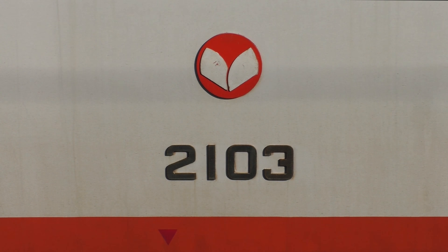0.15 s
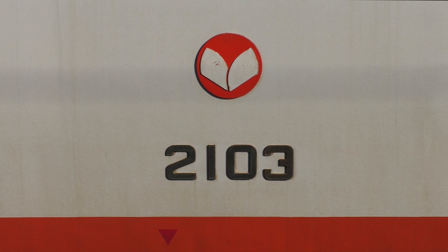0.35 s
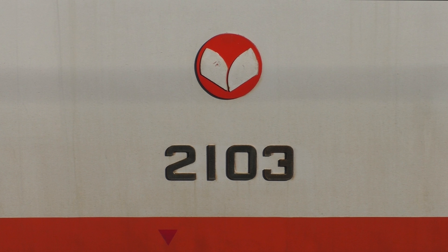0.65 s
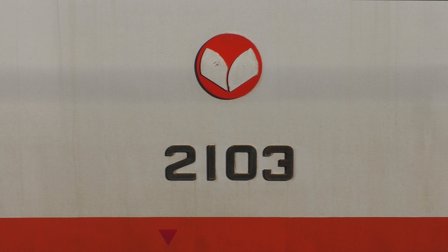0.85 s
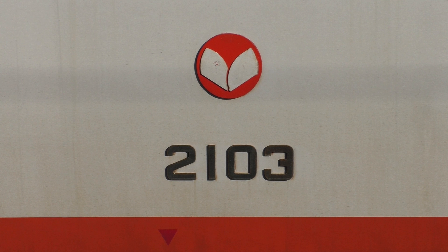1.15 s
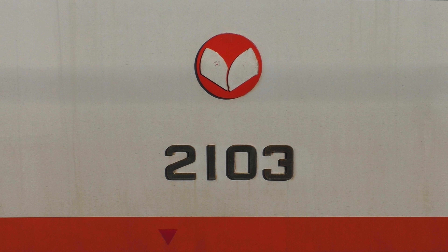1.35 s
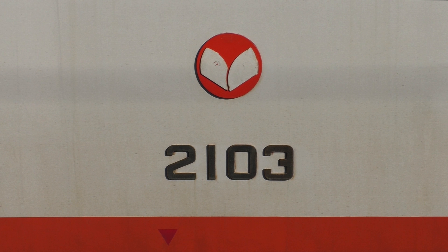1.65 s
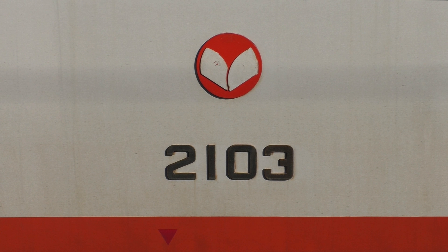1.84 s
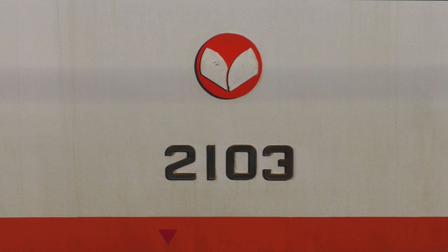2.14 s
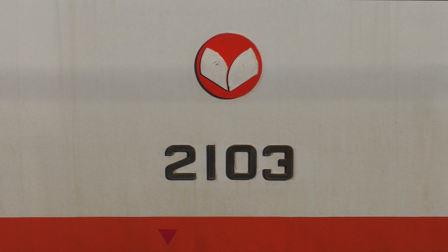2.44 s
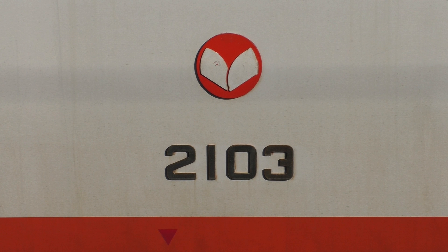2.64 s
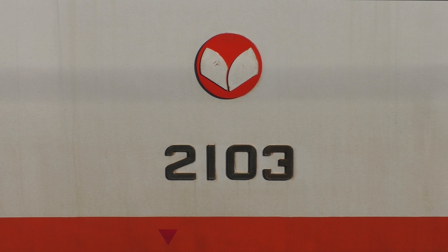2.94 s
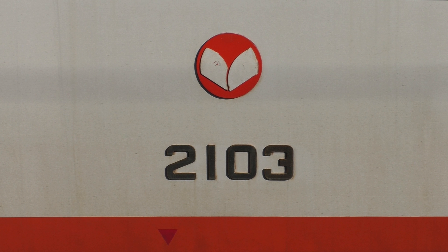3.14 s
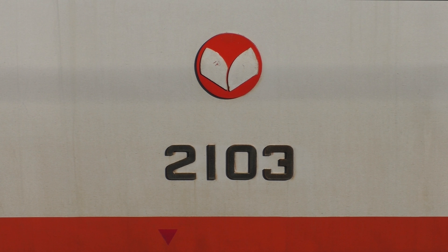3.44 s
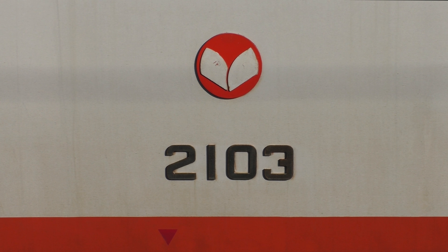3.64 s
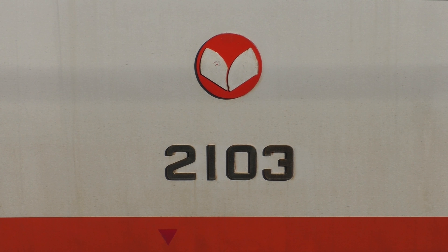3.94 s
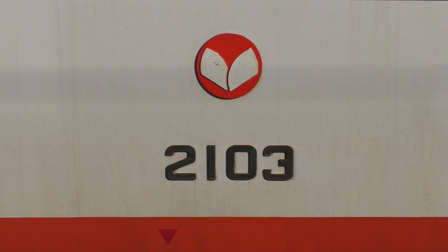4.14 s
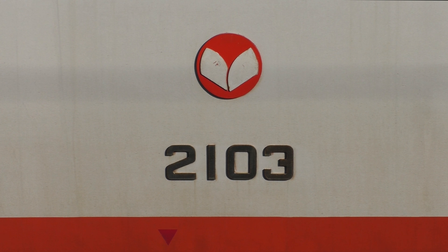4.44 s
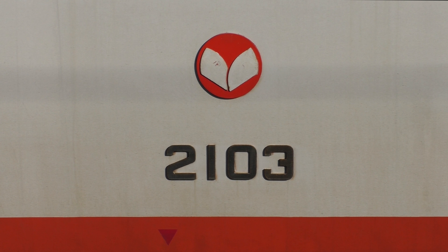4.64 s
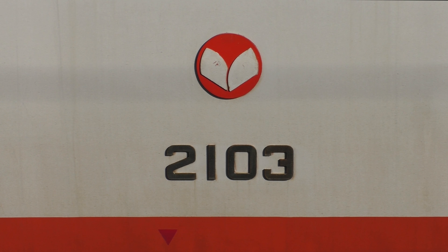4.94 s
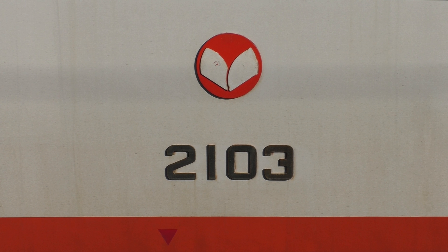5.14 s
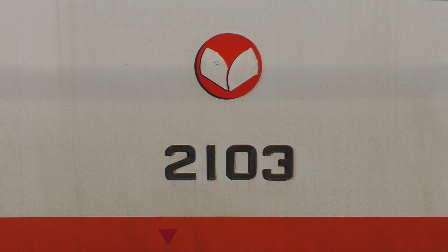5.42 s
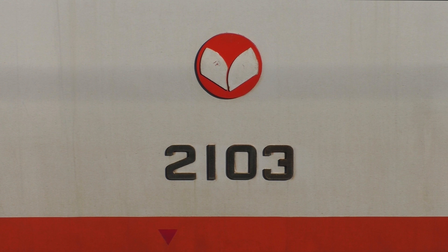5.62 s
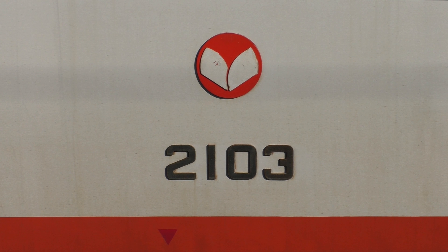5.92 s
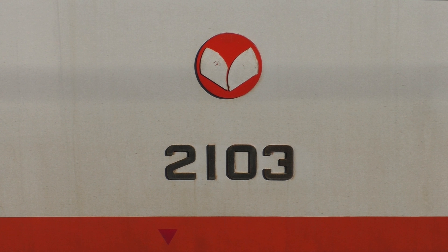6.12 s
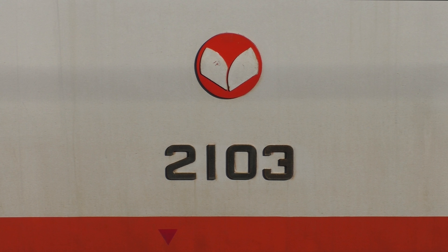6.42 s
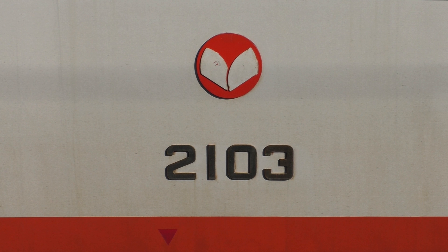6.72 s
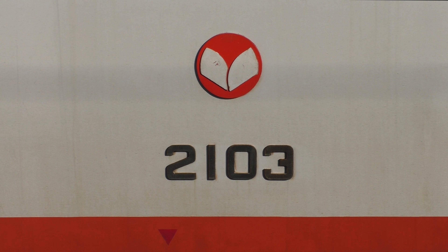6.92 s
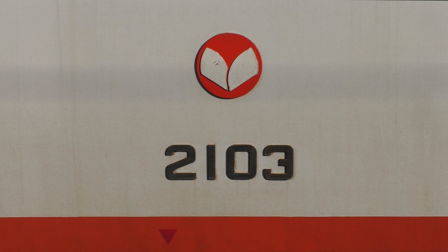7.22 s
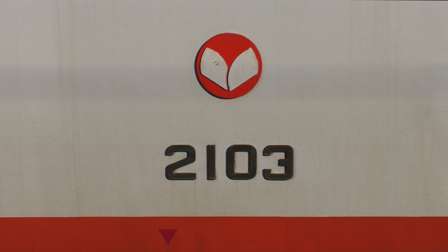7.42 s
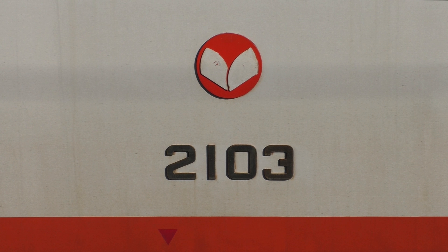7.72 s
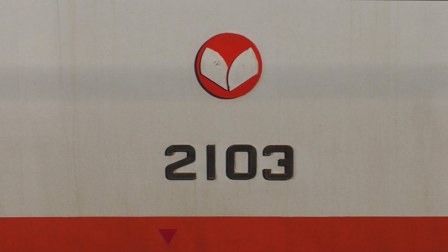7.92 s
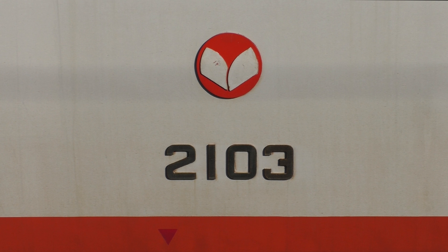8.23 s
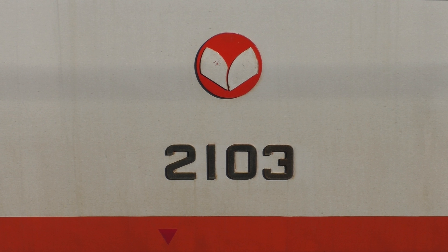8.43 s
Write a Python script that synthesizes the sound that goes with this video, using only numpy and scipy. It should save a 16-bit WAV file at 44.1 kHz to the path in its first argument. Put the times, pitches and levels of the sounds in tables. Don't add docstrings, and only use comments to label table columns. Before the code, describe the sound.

Already running as the sound swells in, a train's air compressor hammers steadily beside a station platform. Each quick turn combines a dull thump, droning casing, hollow metal knocks and crisp valve clatter. An early tank growl subsides around two seconds, while a roughly one-kilohertz whine and airy fan noise persist. Two close-spaced microphones a few metres away catch short scattered reflections from the car side and canopy, with no stop at the end.

```python
import sys
import numpy as np
from scipy import signal
from scipy.fft import rfft, irfft
from scipy.io import wavfile
from scipy.ndimage import uniform_filter1d

SR = 44100
rng = np.random.default_rng(int(sys.argv[2]) if len(sys.argv) > 2 else 0)


def persist_wave(psi):
    counts = np.round(np.clip(psi, -1, 1) * 32767).astype(np.int16)
    wavfile.write(sys.argv[1], SR, np.atleast_2d(counts).T)


def ratio_of_db(decibels):
    return 10 ** (np.asarray(decibels, float) / 20)


N = 377937

CRANK_HZ, START_TURN = 9.18, 1.208
# time in seconds, speed in turns per second.
SPEED_HZ = [
    (0, 9.177),
    (1.4, 9.1595),
    (4, 9.1735),
    (6.2, 9.198),
    (8.57, 9.208),
]
# rms level in dB of crank orders 3, 4, 5 ..
DRONE_DB = [-55, -49, -52, -63, -42, -43, -46, -54, -43, -43, -51, -53, -36, -44, -52, -53, -43, -35, -40,
            -40, -45, -32, -43, -46, -42, -48, -52, -48, -39, -42, -48, -47, -44, -42, -37, -46, -43, -33]
THUMP_TURN, THUMP_TOP_HZ = -0.005, 145
REBOUND_GAIN, REBOUND_TURN = -0.63, 0.223
# angle in crank turns, centre in Hz, width in Hz, level in dB.
KNOCKS = [(.55, 208, 67, -31.5), (.29, 419.6, 74, -21), (.43, 449, 81, -24.5), (.7, 426, 59, -31),
          (0.0208, 472, 65, -29.5), (.5, 789, 74, -23), (.51, 742, 90, -20.5), (0.68, 756, 85, -23.5),
          (0.25, 713, 78, -22), (0.27, 780, 39, -28.5), (0.51, 715, 63, -30), (.1, 700, 64, -42),
          (.51, 1444, 290, -22), (.08, 1200, 420, -57)]
TANK_TOP_HZ = 600
BLOW_JITTER_SAMPLES, BLOW_SPREAD_DB = 2.5, 1.8
# angle in crank turns, level in dB, t60 in seconds.
INLET = [
    (.712, -18.5, 0.06),
    (0.758, -25.5, 0.033),
    (.81, -28.5, 0.069),
    (0.871, -32, 0.21),
]
OUTLET = [
    (0.99, -18.5, 0.067),
    (0.0034, -24.5, 0.037),
    (0.11, -29, 0.062),
    (.16, -31.5, 0.24),
]
SEAT = [
    (0.259, -22.5, 0.11),
    (0.328, -40, 0.096),
]
# centre in Hz, width in Hz, level in dB.
INLET_RING = [(3173, 72, -8.5), (3160, 340, -3.5), (3326, 140, -4), (3687, 195, -1), (4030, 370, -4),
              (4270, 440, -11), (6640, 568, -9.5), (6630, 158, -7.5)]
OUTLET_RING = [(2894, 210, -7.5), (3360, 330, -6.5), (3730, 206, -1.5), (4160, 326, -7), (4423, 243, -3),
               (5000, 490, -11), (5460, 250, -5.5), (6920, 1880, -16), (7920, 5700, -24),
               (10780, 1500, -24.5), (14000, 2100, -53)]
SEAT_RING = [(4030, 460, -9), (4360, 260, -3), (5390, 195, -5), (7240, 1700, -23)]
# angle in crank turns, centre in Hz, width in Hz, level in dB.
PINGS = [
    (.965, 3814, 250, -17.5),
    (.995, 5460, 290, -21),
]
TICK_JITTER_SAMPLES, TICK_SPREAD_DB = 1.0, 1.3
INLET_MEMORY, OUTLET_MEMORY, SEAT_MEMORY, RATTLE_MEMORY = 0.9, 0.888, 0.68, 0.97
# dB at start, dB per second.
KNOCK_DRIFT, INLET_DRIFT, OUTLET_DRIFT, PING_DRIFT = (-0.6, -0.24), (0.2, 0.057), (0.7, -0.11), (-1.5, -0.3)
STEPS_PER_TURN = 4800
# multiple of the crank rate, level in dB.
GEARS = [(164.33, -40), (235.52, -51), (255.6, -47)]
WHINE_ORDER, WHINE_DB = 117.761, -29.5
WHINE_DB_PER_HZ = 179
SIDE_TONE_DB, THROB_RAD, THROB_SLIP_RAD_PER_TURN = -33, 1.74, -0.007
MOTOR_ORDER, MOTOR_DB = 2.4, -64
BOOM_DB, BOOM_REST_DB, BOOM_RISE_S, BOOM_END_S, BOOM_FALL_S = 6, -3, 0.36, 1.5, 0.5
# frequency in Hz, density in dB per Hz.
RATTLE_DB = [(250, -6), (400, 11.5), (600, -1), (800, -1.5), (1000, -6), (1400, -0.5), (2000, -20),
             (2600, -30), (4000, -10), (8000, -83)]
# frequency in Hz, density in dB per Hz.
RUSH_DB = [(15, -44), (25, -26), (204, -2), (399, -5.5), (598, -6.5), (741, -4.5), (1000, -5), (1200, -8.5),
           (2630, -15), (3720, -18), (5580, -24), (8000, -37), (10400, -48), (15500, -47)]
# frequency in Hz, level in dB.
APART_DB = [(25, -5), (100, -11), (300, -14), (1000, -14), (3000, -13), (8000, -8), (11000, -24),
            (15500, -24)]
# frequency in Hz, level in dB.
ECHO_DB = [(25, -20), (150, -6), (400, -4), (1200, -3), (5000, 0), (9000, -10), (11000, -25), (15500, -30)]
# frequency in Hz, left minus right in dB.
PORT_DB = [(25, 4.5), (60, 3.8), (160, 4), (300, .5), (500, -3.5), (800, -4), (1400, -3.5), (2800, -4.5),
           (5000, -2), (8000, 0), (15000, .3)]
# frequency in Hz, left lead in radians.
PORT_RAD = [(25, 0), (125, -.6), (300, -.4), (800, .2), (1800, .5), (3100, .7), (4650, 1.3), (6800, 1.75),
            (9000, 2.05), (11100, 2.45), (15500, 2.5)]
# frequency in Hz, gain in dB.
TONE_DB = [(25, 0.5), (300, -0.5), (3000, 0), (5000, 0.5), (7000, 2), (9000, 8.5), (11500, 12),
           (14000, 17.5), (14700, 3), (15800, -14)]
FADE_FROM_DB, FADE_S = -9, 0.75


def level(x, db):
    return x * ratio_of_db(db) / np.sqrt(np.mean(x ** 2))


def along_hz(table):
    hz, value = np.transpose(table)
    bins_hz = np.fft.rfftfreq(N, 1 / SR)
    return np.interp(np.log(bins_hz + 1), np.log(hz + 1), value)


def colour(x, table):
    return irfft(rfft(x) * ratio_of_db(along_hz(table)), N)


def ring(x, hz, width_hz):
    return signal.lfilter(*signal.iirpeak(hz, hz / width_hz, SR), x)


def walk(rate_hz):
    k = int(SR / rate_hz)
    held = np.repeat(rng.standard_normal(N // k + 1), k)
    smooth = uniform_filter1d(uniform_filter1d(held, k), k)
    return 1.12 * smooth[:N]


def blows(turn, at_turn, db, late_samples, spread_db):
    hit = np.flatnonzero(np.diff(np.floor(turn - at_turn)))
    late, force = rng.standard_normal((len(hit), 2)).T
    out = np.zeros(N)
    place = np.clip(hit + (late_samples * late).astype(int), 0, N - 1)
    out[place] = ratio_of_db(db + spread_db * force)
    return out


def echoing_noise(turn, memory):
    memory = np.clip(memory, 0, 0.99)
    fresh = rng.standard_normal((int(turn[-1]) + 40, STEPS_PER_TURN))
    kept = signal.lfilter([np.sqrt(1 - memory ** 2)], [1, -memory], fresh, axis=0)[30:]
    return kept[turn.astype(int), (turn % 1 * STEPS_PER_TURN).astype(int)]


def drone(turn):
    out = 0
    for k, db in enumerate(DRONE_DB, 3):
        phase_rad = 2 * np.pi * rng.random()
        if k * CRANK_HZ < THUMP_TOP_HZ:
            phase_rad = np.angle(1 + REBOUND_GAIN * np.exp(-2j * np.pi * k * REBOUND_TURN))
        tone = np.sqrt(2) * np.cos(2 * np.pi * k * (turn - THUMP_TURN) + phase_rad)
        out = out + ratio_of_db(db + 0.6 * walk(2.5)) * tone
    return out


def knocks(turn, rows, late_samples, spread_db):
    out = 0
    for at_turn, hz, width_hz, db in rows:
        push = blows(turn, at_turn, db, late_samples, spread_db) * SR / width_hz / 2
        out = out + ring(ring(push, hz, width_hz), hz, width_hz)
    return out


def valve(turn, landings, modes, memory):
    envelope = 0
    for at_turn, db, t60_s in landings:
        since = turn - at_turn + 1
        force_db = 0.72 * rng.standard_normal(int(since[-1]) + 1)[since.astype(int)]
        envelope = envelope + ratio_of_db(db + force_db - 60 * (since % 1) / CRANK_HZ / t60_s)
    chatter = ratio_of_db(-1.0) * envelope * echoing_noise(turn, memory)
    first_turn, first_db, _ = landings[0]
    tick = blows(turn, first_turn, first_db + 12, TICK_JITTER_SAMPLES, TICK_SPREAD_DB)
    highpass = signal.butter(3, 2500, "high", fs=SR, output="sos")
    push = signal.sosfilt(highpass, chatter + tick)
    out = 0
    for k, (hz, width_hz, mode_db) in enumerate(modes):
        out = out + (-1) ** k * ratio_of_db(mode_db + 15) * ring(push, hz, width_hz)
    return out


def gears(turn, speed_hz):
    whine_db = WHINE_DB + WHINE_DB_PER_HZ * (speed_hz - CRANK_HZ)
    upper = np.exp(1j * (2 * np.pi * turn + THROB_RAD + THROB_SLIP_RAD_PER_TURN * turn))
    lower = 0.076 * np.exp(-2j * np.pi * turn)
    load = ratio_of_db(SIDE_TONE_DB + 1.3 * walk(2.54)) * (upper + lower)
    carrier = np.exp(2j * np.pi * WHINE_ORDER * turn + 0.25j * walk(2.67))
    out = np.real(carrier * (ratio_of_db(whine_db) + load))
    for order, db in GEARS:
        out = out + ratio_of_db(db + 2.0 * walk(1.34)) * np.cos(2 * np.pi * order * turn + 0.16 * walk(2.7))
    motor = ratio_of_db(MOTOR_DB) * np.cos(2 * np.pi * MOTOR_ORDER * turn)
    return np.sqrt(2) * (out + motor)


def growl(t):
    rise = 0.36 + t / BOOM_RISE_S * 0.85
    fall = 1 - (t - BOOM_END_S) / BOOM_FALL_S
    swell = np.clip(np.minimum(rise, fall), 0, 1)
    boom_db = BOOM_REST_DB + (BOOM_DB - BOOM_REST_DB) * swell
    air = rng.standard_normal(N)
    low = ring(ring(air, 366, 53), 366, 53)
    high = ring(ring(air, 392, 44), 392, 44)
    return level(low + ratio_of_db(-1.0) * high, -34) * ratio_of_db(1.05 * boom_db + 0.68 * walk(3.7))


def rattle(turn):
    return level(colour(echoing_noise(turn, RATTLE_MEMORY), RATTLE_DB), -28.5)


def rush():
    return level(colour(rng.standard_normal(N), RUSH_DB), -27) * ratio_of_db(0.7 * walk(6))


def platform(x, t60_s, db):
    s = np.arange(int(0.3 * SR)) / SR
    tail = rng.standard_normal((2, len(s))) * ratio_of_db(-60 * s / t60_s) * (s > 0.004)
    tail = tail / np.sqrt(np.sum(tail ** 2, axis=1, keepdims=True))
    return ratio_of_db(db) * signal.fftconvolve(x[None], tail, axes=1)[:, :N]


def ports(x):
    half = ratio_of_db(along_hz(PORT_DB) / 2) * np.exp(0.5j * along_hz(PORT_RAD))
    return irfft(rfft(x) * np.array([half, 1 / half]), N)


def scene():
    t = np.arange(N) / SR
    speed_hz = np.interp(t, *np.transpose(SPEED_HZ))
    turn = START_TURN + np.cumsum(speed_hz) / SR
    drifts = (KNOCK_DRIFT, INLET_DRIFT, OUTLET_DRIFT, PING_DRIFT)
    knock, inlet, outlet, ping = (ratio_of_db(db + db_per_s * t) for db, db_per_s in drifts)

    tank_rows = [row for row in KNOCKS if row[1] < TANK_TOP_HZ]
    pipe_rows = [row for row in KNOCKS if row[1] >= TANK_TOP_HZ]
    tank = knocks(turn, tank_rows, BLOW_JITTER_SAMPLES, BLOW_SPREAD_DB)
    pipes = knocks(turn, pipe_rows, BLOW_JITTER_SAMPLES, BLOW_SPREAD_DB) * knock
    inlet_plate = valve(turn, INLET, INLET_RING, INLET_MEMORY) * inlet
    outlet_side = valve(turn, OUTLET, OUTLET_RING, OUTLET_MEMORY) + valve(turn, SEAT, SEAT_RING, SEAT_MEMORY)
    pings = knocks(turn, PINGS, TICK_JITTER_SAMPLES, TICK_SPREAD_DB) * ping
    plates = inlet_plate + (outlet_side + pings) * outlet

    struck = tank + pipes + plates + rattle(turn) + growl(t)
    near = struck + rush() + drone(turn) + gears(turn, speed_hz)
    echoes = platform(colour(struck, ECHO_DB), 0.095, -11)
    around = np.array([colour(rush(), APART_DB), colour(rush(), APART_DB)]) * ratio_of_db(7.5)
    fade = np.interp(t, [0, FADE_S], [ratio_of_db(FADE_FROM_DB), 1])
    return (ports(near) + echoes + around) * fade


def low_pass(x):
    return signal.sosfilt(signal.butter(12, 15760, fs=SR, output="sos"), x)


def record(dry):
    mix = colour(dry, TONE_DB)
    return low_pass(mix)


dry = scene()
out = record(dry)
persist_wave(out)
```